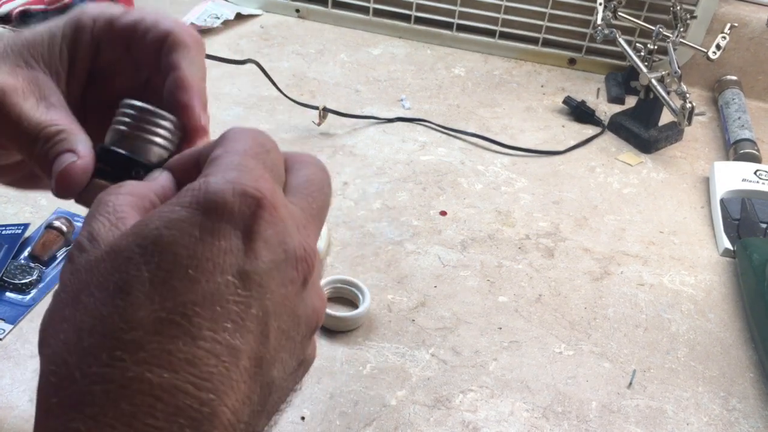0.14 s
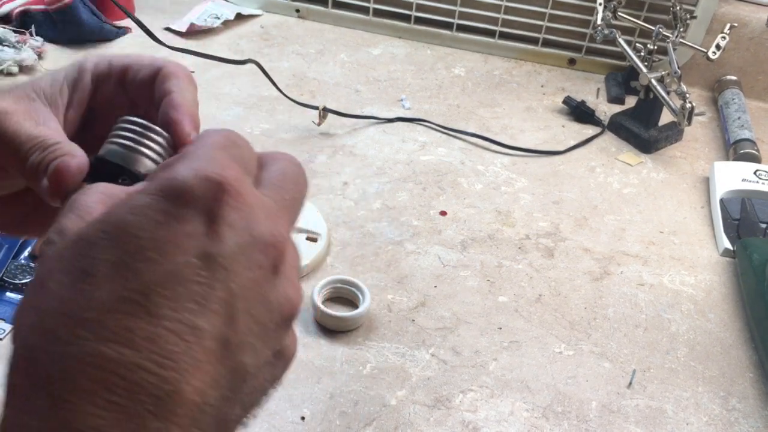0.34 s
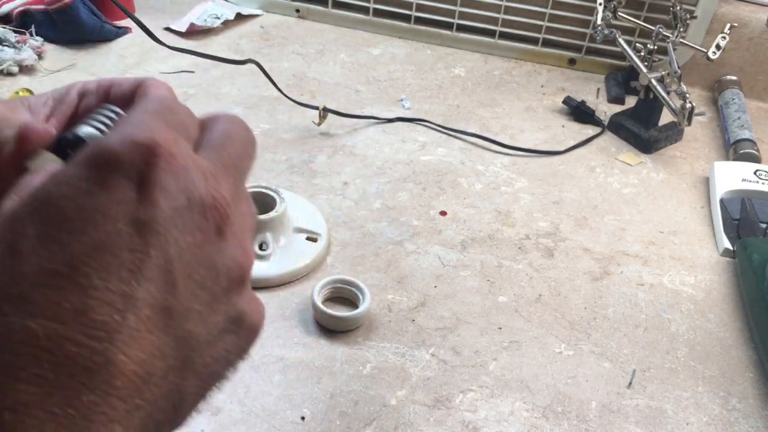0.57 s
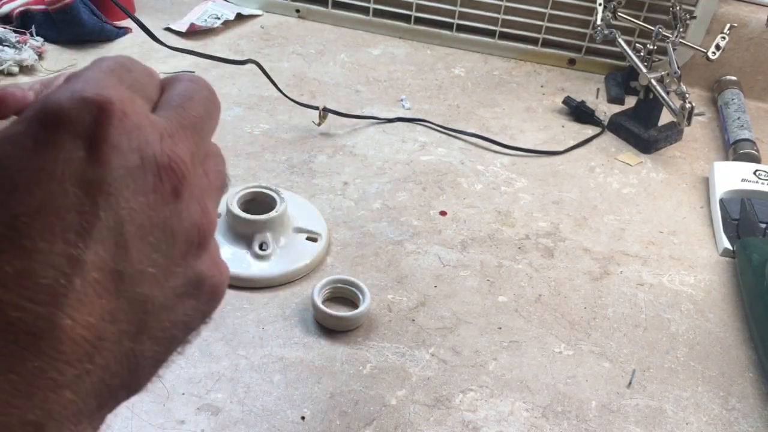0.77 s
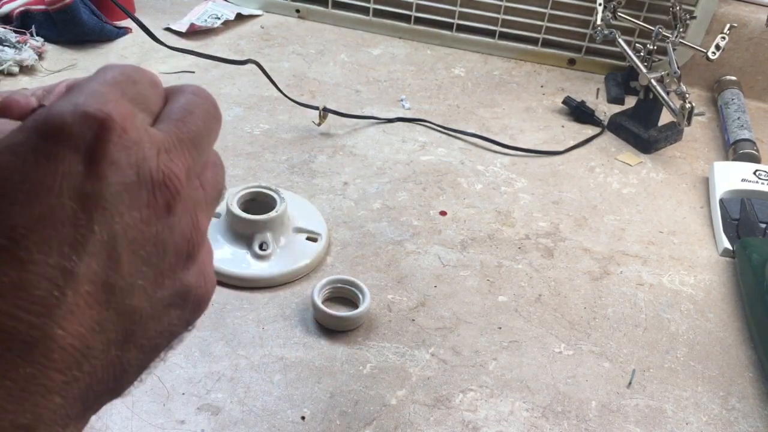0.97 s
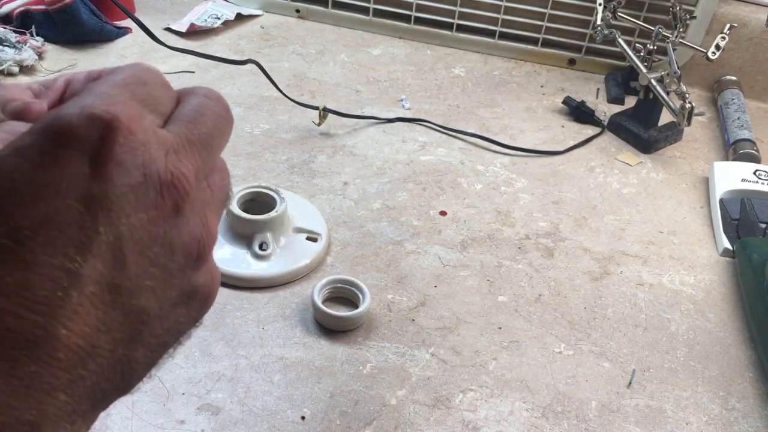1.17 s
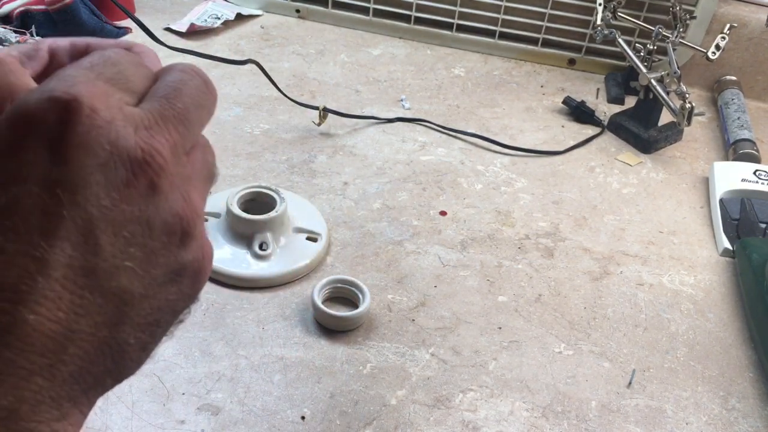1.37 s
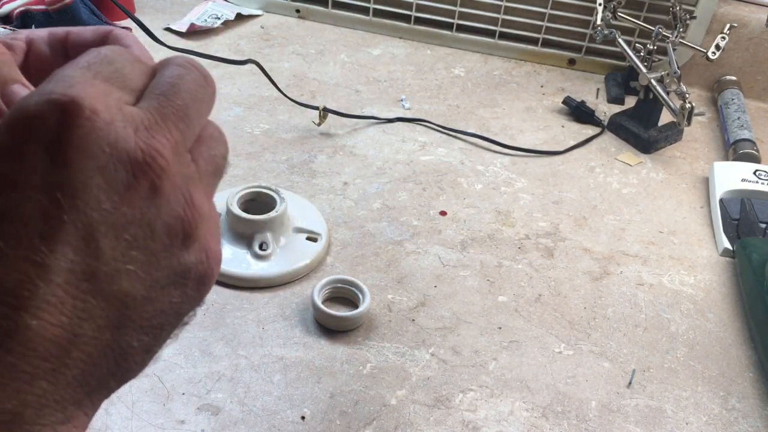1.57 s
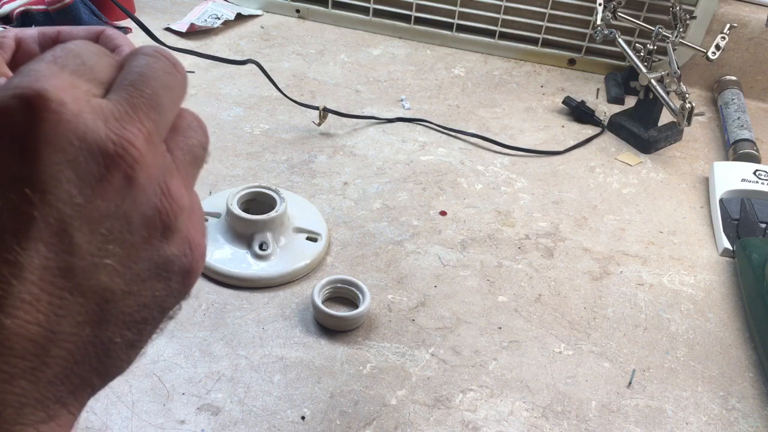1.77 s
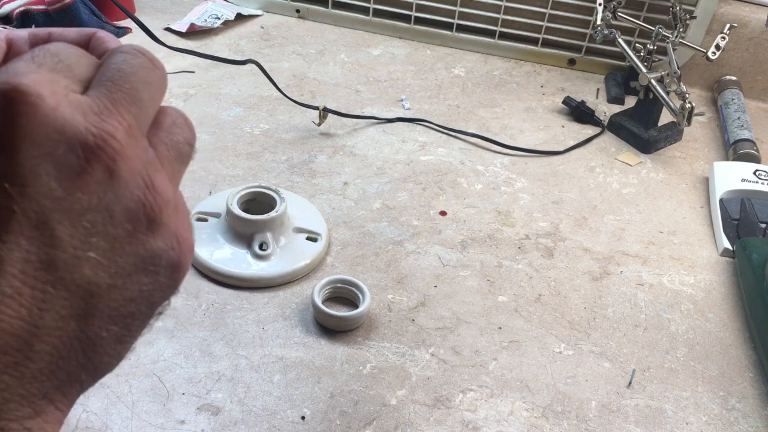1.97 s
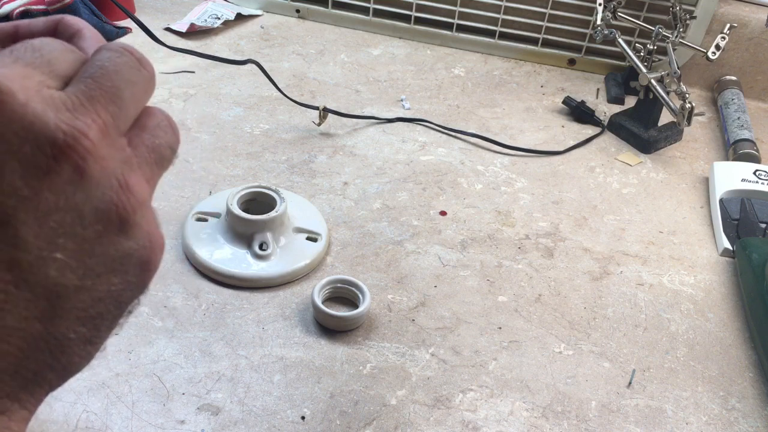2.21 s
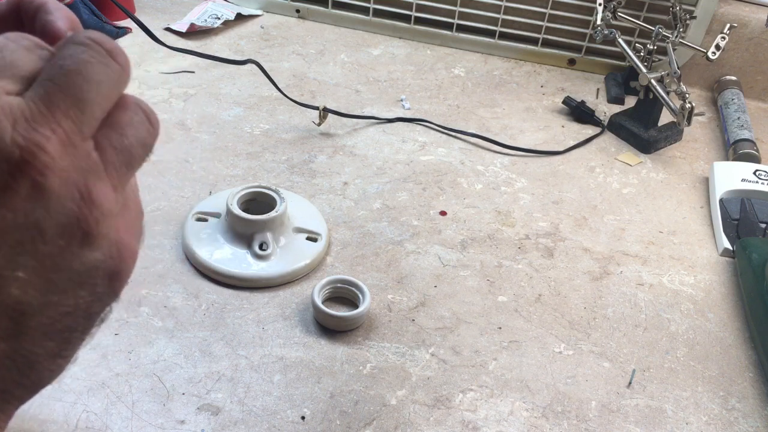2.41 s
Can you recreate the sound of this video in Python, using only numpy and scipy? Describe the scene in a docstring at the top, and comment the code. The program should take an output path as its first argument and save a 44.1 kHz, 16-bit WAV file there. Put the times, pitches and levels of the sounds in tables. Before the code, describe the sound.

A metal lamp-socket switch snaps once, hard and bright, then faint handling ticks over low hum

```python
"""One hard, bright snap rings in a small room; a soft hiss set in just before it lingers and stops.
Faint ticks precede and follow; later, parts slide, tap and rub, over steady hum and low rumble.
It is a small metal lamp-socket switch worked by hand over a workbench, close to the microphone.
Snap, shell and taps are sums of decaying sines; ticks, echoes, hiss and rumble are shaped noise;
slides and rubs are random slips through resonators; hum is a set of wavering sines."""
import sys
import numpy as np
from scipy import signal
from scipy.fft import rfft, irfft
from scipy.io import wavfile

SR = 44100
rng = np.random.default_rng(int(sys.argv[2]) if len(sys.argv) > 2 else 0)


def wrap_up_sound(samples):
    """Save the sound to the file named by the first command line argument, as 16-bit audio."""
    columns = np.atleast_2d(samples).T
    # keep every value between -1 and 1, then stretch to whole-number steps
    tamed = np.clip(columns, -1, 1)
    steps = np.round(tamed * 32767).astype(np.int16)
    wavfile.write(sys.argv[1], SR, steps)


N = 108045
TIME = np.arange(N) / SR  # s


def from_db(db):
    """Decibels to gain, floored at -200 dB."""
    return np.exp(np.maximum(db, -200) * (np.log(10) / 20))


def rms_one(x):
    """Scale to unit rms."""
    return x / np.sqrt(np.mean(x ** 2) + 1e-20)


def coloured(x, colour):
    """Weight the spectrum by (frequency [Hz], level [dB per Hz]) points on a log axis; rms 1."""
    hz, db = np.transpose(colour)
    bins_hz = np.maximum(np.fft.rfftfreq(N, 1 / SR), 1)
    gain = from_db(np.interp(np.log(bins_hz), np.log(hz), db))
    return rms_one(irfft(rfft(x) * gain, N))


def noise(colour):
    """Gaussian noise with the given spectrum; rms 1."""
    return coloured(rng.standard_normal(N), colour)


def drift(rate_hz):
    """Slow random curve through 4 * rate_hz knots per second; rms 1."""
    knots = rng.standard_normal(int(4 * rate_hz * N / SR) + 2)
    knot_times_s = np.linspace(0, N / SR, len(knots))
    return rms_one(np.interp(TIME, knot_times_s, knots))


def decay(start_s, t60_s):
    """Envelope that jumps to 1 and dies away exponentially."""
    return (TIME >= start_s) * from_db(-60 * np.clip((TIME - start_s) / t60_s, 0, 5))


def ring(start_s, modes, length_s=0.57):
    """Modes struck at one moment: decaying sines with alternating signs."""
    out = np.zeros(N)
    live = (TIME >= start_s) & (TIME < start_s + length_s)
    age_s = TIME[live] - start_s
    for k, (hz, db, t60_s) in enumerate(modes):
        envelope = from_db(db - 60 * age_s / t60_s)
        out[live] += (-1) ** k * envelope * np.sin(2 * np.pi * hz * age_s)
    return out


def background(rumble_db=-54, air_db=-72, waver_hz=5):
    """Mains hum and a machine's drone, each line wavering, over low rumble and the room's faint air."""
    # hum and drone lines: (frequency [Hz], level [dB rms], waver [share of amplitude])
    hum_lines = [(40.5, -64, .2), (59.2, -49.5, .05), (122.8, -58, .6), (177, -64, .6), (237.5, -69.5, .6),
                 (314, -74, .7), (408, -72, .4), (641, -77.5, .4)]
    # background rumble spectrum: (frequency [Hz], level [dB per Hz])
    rumble_colour = [(20, -27.5), (34, -23.5), (48, -5), (72, 1), (100, 0.5), (150, -7), (200, -12),
                     (300, -11), (480, -22), (700, -25.5), (1000, -33), (1500, -45.5)]
    # quiet room air spectrum: (frequency [Hz], level [dB per Hz])
    air_colour = [(590, -33), (1000, -3), (1450, -11), (2350, -12), (2550, -15), (3770, -16), (4810, -21),
                  (5650, -17), (10100, -16), (12400, -10), (15800, -16)]
    hum = 0
    for hz, db, waver in hum_lines:
        swing = 1 + waver * (drift(waver_hz) + 1j * drift(waver_hz))  # amplitude and phase
        swing = swing / np.sqrt(1 + 2 * waver ** 2)  # keeps the rms level
        carrier = np.exp(2j * np.pi * (hz * TIME + rng.random()))
        hum = hum + from_db(db) * np.sqrt(2) * np.real(swing * carrier)
    return hum + from_db(rumble_db) * noise(rumble_colour) + from_db(air_db) * noise(air_colour)


def ticks(t60_s=0.033, width_octaves=0.78, crest_db=9, skirt_db=-14, bass_db=-35):
    """Each light touch of the loose parts is a decaying noise burst around its own pitch."""
    # light ticks: (time [s], approximate peak level [dB], centre frequency [Hz])
    touches = [(0.167, -43.5, 13100), (0.4445, -45.5, 8300), (0.459, -53, 8700), (0.756, -54.5, 2350),
               (1.3503, -43, 13000), (1.3545, -56, 4400), (1.4195, -53, 8500), (1.97, -61, 6500)]
    out = np.zeros(N)
    width = 2 ** width_octaves  # frequency ratio
    for start_s, peak_db, hz in touches:
        colour = [(hz / 10, bass_db), (hz / width, skirt_db), (hz, 0), (hz * width, skirt_db)]
        out += from_db(peak_db - crest_db) * decay(start_s, t60_s) * noise(colour)
    return out


def hiss(start_s=0.2055, end_s=0.635, fade_s=0.017, level_db=-61.5):
    """Even coloured noise, held between short linear fades."""
    # hiss spectrum: (frequency [Hz], level [dB per Hz])
    hiss_colour = [(400, 2), (900, -2), (3200, -2), (4900, -7.5), (5900, -3), (7400, -9), (8300, -5.5),
                   (14500, -6.5), (16000, -7)]
    held = np.clip(np.minimum(TIME - start_s, end_s - TIME) / fade_s, 0, 1)
    return from_db(level_db) * held * noise(hiss_colour)


def switch(low_cut_hz=1400, echo_delay_s=0.002):
    """Contact cracks and bounces, shell rings, bench and room answer; so small a part radiates little bass."""
    # switch-over and contact bounce: (time [s], level [dB])
    snaps = [(0.2235, -0.5), (0.2241, -13)]
    # broad, quickly damped snap resonances: (frequency [Hz], level [dB], t60 [s])
    crack_modes = [(2280, -17.5, .0035), (3120, -20.5, 0.0036), (3875, -27.5, .006), (5300, -23.5, 0.0045),
                   (6800, -29.5, 0.0038), (8150, -13.5, 0.00399), (10750, -11, 0.004), (11950, -3, 0.0028),
                   (13690, -6, 0.0052)]
    # ringing modes of the metal shell: (frequency [Hz], level [dB], t60 [s])
    shell_modes = [(1590, -67, 0.73), (2100, -44.5, .05), (2250, -42.5, 0.1), (2842, -53.5, 0.24),
                   (2970, -46, .08), (3950, -49.5, .09), (5201, -62, .28), (8543, -29.5, .03),
                   (8750, -44, 0.14), (11200, -43, .1), (11540, -42, .12), (11680, -34.5, .115),
                   (12040, -38.5, .095), (12270, -46, 0.16), (12500, -49, .22), (13060, -46.5, 0.16),
                   (13698, -36.5, .11), (13926, -42.5, .15), (14410, -43.5, .12)]
    # one further shell mode: (frequency [Hz], level [dB], t60 [s])
    ping_mode = (4316, -37.5, .13)
    # reflection spectrum: (frequency [Hz], level [dB per Hz])
    echo_colour = [(500, -29.5), (1300, -22.5), (2300, -8.5), (3400, -9), (5000, -8.5), (6700, -10),
                   (8400, -1.5), (9800, -5.5), (11700, -1), (13800, 0.5), (15800, -7.5)]
    start_s = snaps[0][0]
    crack = sum(from_db(db) * ring(snap_s, crack_modes) for snap_s, db in snaps)
    shell = ring(start_s, shell_modes + [ping_mode])
    arrival_s = start_s + echo_delay_s
    early = from_db(-22) * decay(arrival_s, 0.018) * noise(echo_colour)  # bench and hands
    late = from_db(-34) * decay(arrival_s, 0.165) * noise(echo_colour)  # room
    low_cut = signal.butter(2, low_cut_hz, "high", fs=SR, output="sos")
    return signal.sosfilt(low_cut, crack + shell + early + 1e-18) + late


def friction(pushes, modes):
    """Dense tiny slips excite resonances that wander in level as the contact moves; pushes swell and fade."""
    edge_db = 16  # lost over one rise or fall time
    slips_per_s, slip_spread_db = 1700, 1
    shift_rate_hz, shift_db = 22, 1.8
    slip_now = rng.random(N) < slips_per_s / SR
    slip_size = from_db(slip_spread_db * rng.standard_normal(N))
    slips = slip_now * rng.choice([-1, 1], N) * slip_size
    body = 0
    for k, (hz, width_hz, db) in enumerate(modes):
        r = np.exp(-np.pi * width_hz / SR)  # pole radius
        poles = [1, -2 * r * np.cos(2 * np.pi * hz / SR), r * r]
        mode = (1 - r * r) * signal.lfilter([1, 0, -1], poles, slips + 1e-18)
        body = body + (-1) ** k * from_db(db + shift_db * drift(shift_rate_hz)) * mode
    push = 0
    for peak_s, db, rise_s, fall_s in pushes:
        distance = np.maximum((peak_s - TIME) / rise_s, (TIME - peak_s) / fall_s)
        push = push + from_db(db - edge_db * distance)
    return push * rms_one(body)


def slides():
    """Metal slides on metal: friction through the sliding parts' resonances."""
    # slides: (time of hardest push [s], level [dB], rise [s], fall [s])
    slide_pushes = [(1.246, -69, 0.0044, 0.022), (1.286, -70, 0.0046, 0.025), (1.312, -73, .005, .025),
                    (1.326, -65, 0.018, 0.035), (1.352, -56.5, 0.034, 0.04), (1.3542, -54, 0.0023, 0.0058),
                    (1.395, -70, 0.036, 0.044), (1.422, -66, 0.0056, 0.025), (1.52, -71, 0.06, 0.053)]
    # resonances of the sliding parts: (frequency [Hz], width [Hz], level [dB])
    slide_modes = [(2280, 300, -14.5), (3840, 360, -11), (5040, 420, -9), (5980, 140, -3.5),
                   (6800, 420, -12), (9010, 290, -1), (10500, 600, -9.5), (11500, 1100, -13),
                   (12800, 400, -9), (14000, 670, -12), (14350, 450, -5)]
    return friction(slide_pushes, slide_modes)


def taps():
    """Taps as the grip changes; each rings the socket's body briefly."""
    # taps: (time [s], level [dB])
    tap_hits = [(1.611, -69.5), (1.9695, -62.5)]
    # modes of the tapped body: (frequency [Hz], level [dB], t60 [s])
    tap_modes = [(3190, -8, 0.055), (4070, -7, .02), (4750, -3, 0.033), (5230, -5, .06), (7000, -5, .012),
                 (9200, -1, .012), (10500, -2, .03), (12600, -2, .012), (14200, 2, .028)]
    return sum(from_db(db) * ring(start_s, tap_modes) for start_s, db in tap_hits)


def rubs():
    """The grip shifts and rubs: friction through the socket's resonances."""
    # rubs: (time of hardest push [s], level [dB], rise [s], fall [s])
    rub_pushes = [(1.615, -60.5, 0.018, 0.026), (1.642, -67.5, .025, 0.05), (1.7, -79, .05, 0.063),
                  (1.91, -73, 0.033, 0.046), (1.9705, -67, .0016, 0.023)]
    # resonances of the rubbed socket: (frequency [Hz], width [Hz], level [dB])
    rub_modes = [(3280, 930, -7), (4680, 240, 0), (5960, 1100, -5.5), (8940, 350, -1.5), (9900, 640, -4),
                 (11200, 300, 3), (12400, 390, 0), (14000, 480, 2), (14600, 500, 0)]
    return friction(rub_pushes, rub_modes)


def scene():
    """Sum of all sources at one microphone."""
    handling = ticks() + slides() + taps() + rubs()
    return (background() + hiss() + switch() + handling)[None]


def record(dry, cutoff_hz=15900):
    """Steep elliptic low-pass cuts the top."""
    low_pass = signal.ellip(10, 0.1, 80, cutoff_hz, fs=SR, output="sos")
    return signal.sosfilt(low_pass, dry)


dry = scene()
out = record(dry)
wrap_up_sound(out)
```